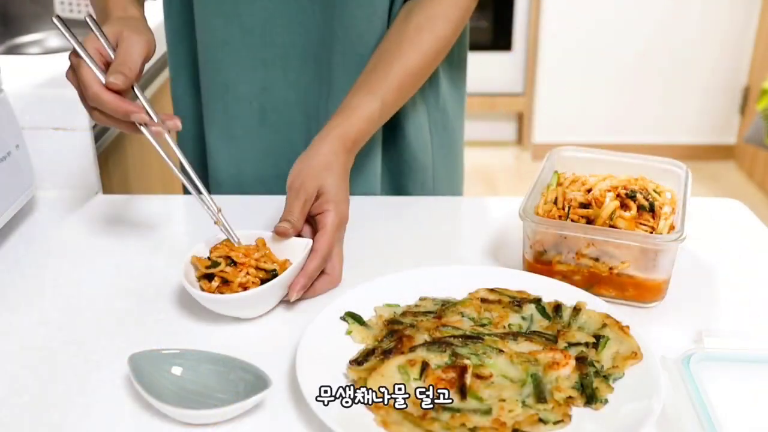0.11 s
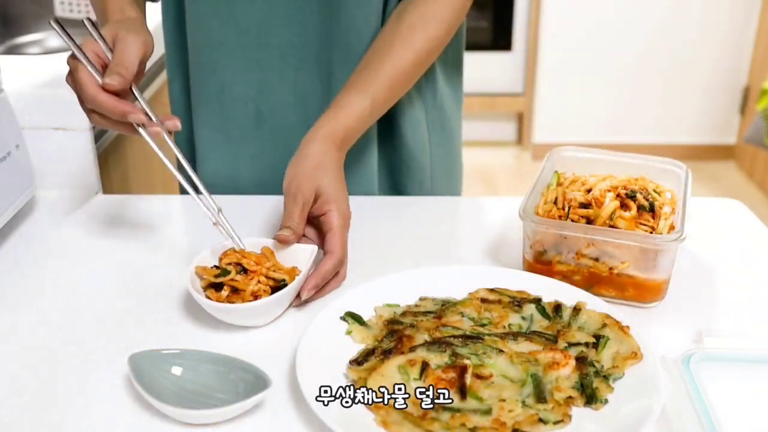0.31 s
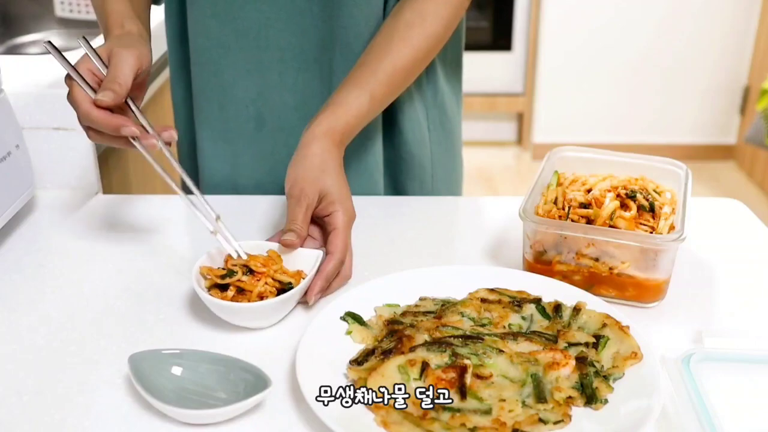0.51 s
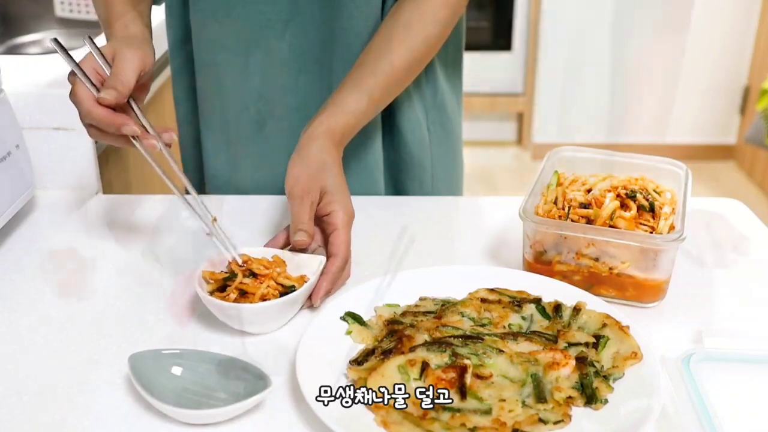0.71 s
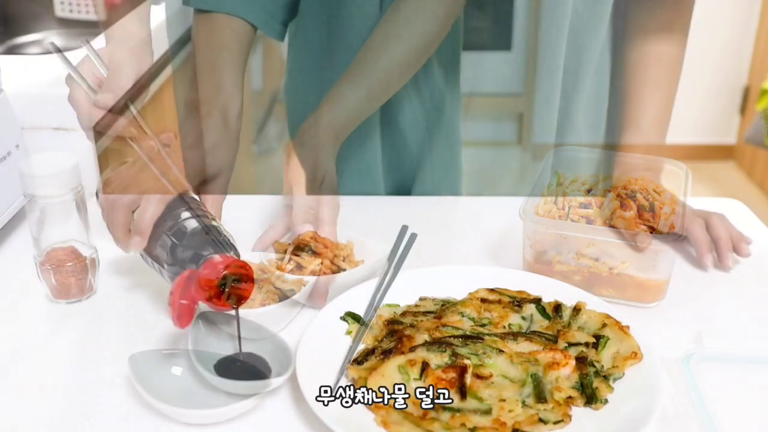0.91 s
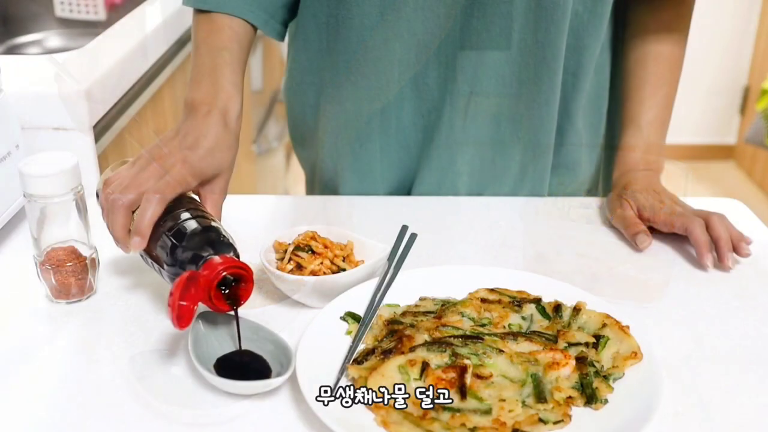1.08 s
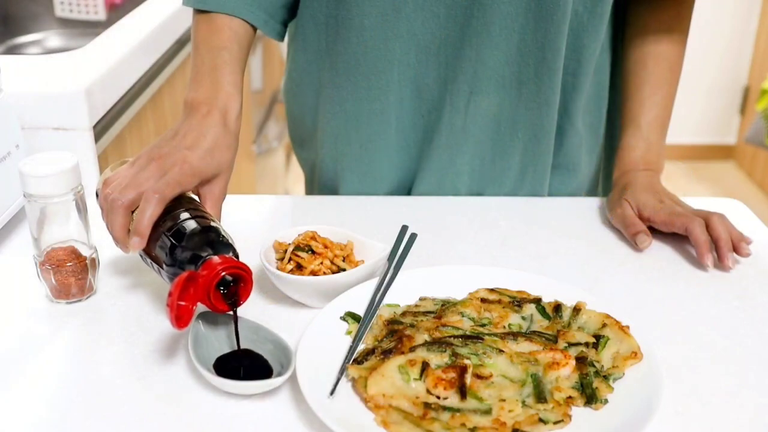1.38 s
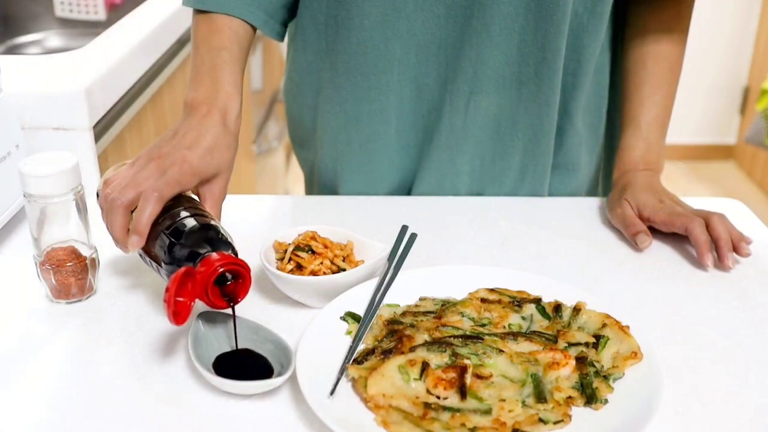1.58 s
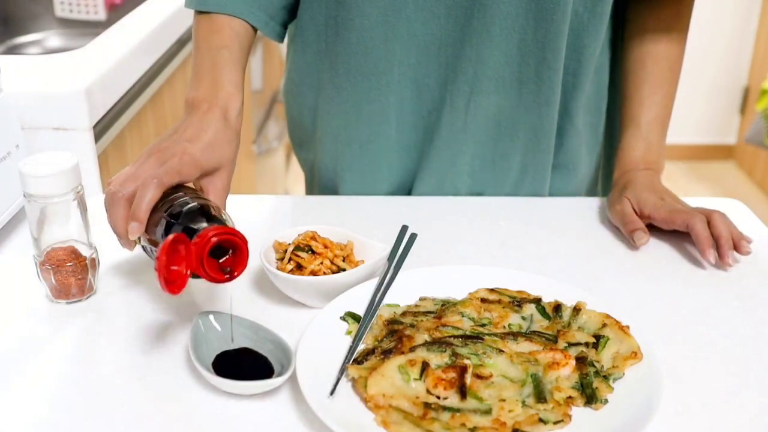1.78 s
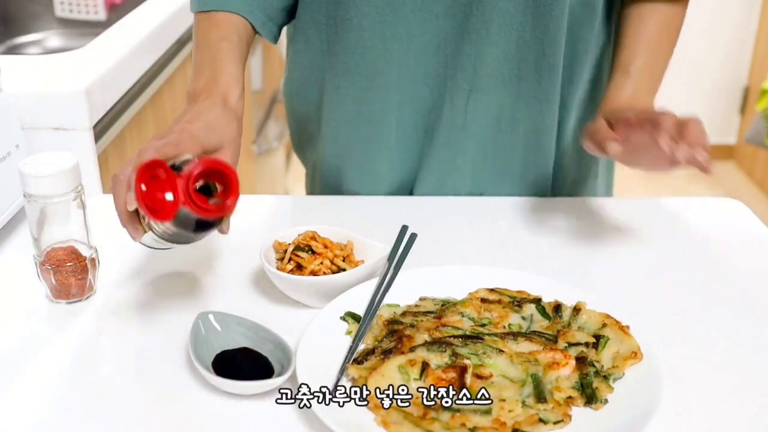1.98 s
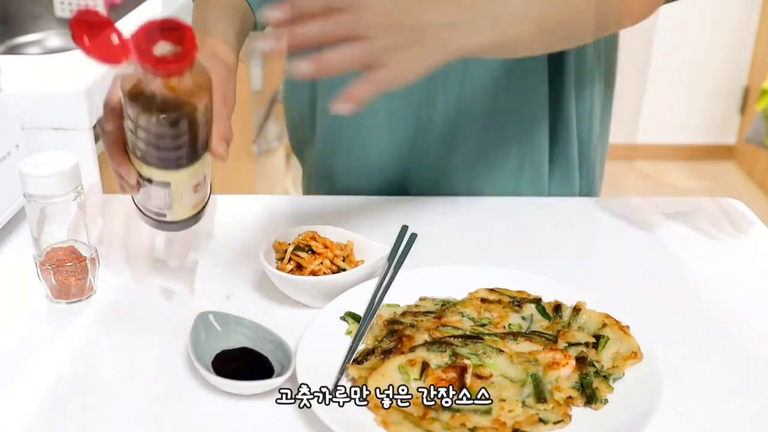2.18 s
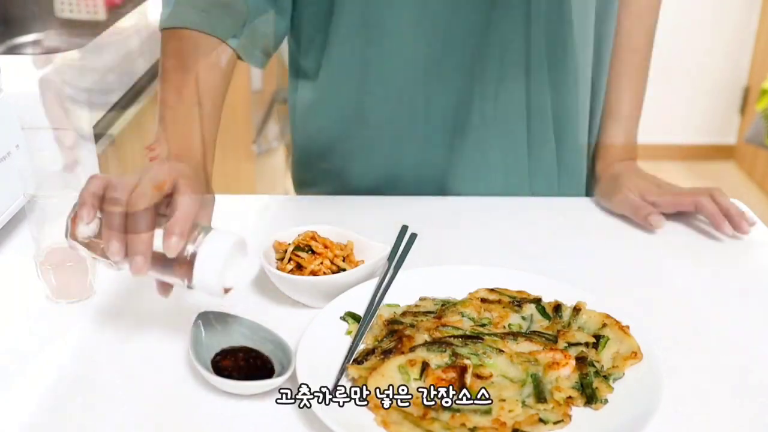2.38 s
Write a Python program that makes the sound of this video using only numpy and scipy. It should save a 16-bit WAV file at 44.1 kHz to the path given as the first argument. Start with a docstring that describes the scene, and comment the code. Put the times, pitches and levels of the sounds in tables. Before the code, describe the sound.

One hard, dry plastic lid snap distorts the close stereo microphone, then a bowl clunks on a tabletop, again more faintly; tiny bottle clicks come late, with an appliance humming throughout a lively kitchen.

```python
"""A plastic lid snaps shut on a glass container, close enough to overload the microphone, and the kitchen rings on.
A bowl then knocks twice on the table, and a sauce bottle gives faint ticks and drips, with thin high whistles.
Under it all runs the steady rush and hum of a kitchen appliance.
Blows are damped sine modes plus noise cracks, with echoes and a decaying noise tail for the room;
the whistles are gliding sines, and the appliance is coloured stereo noise with a few wavering tones."""
import sys
import numpy as np
from scipy import signal
from scipy.fft import rfft, irfft, next_fast_len
from scipy.io import wavfile
from scipy.ndimage import map_coordinates

SR = 44100
rng = np.random.default_rng(int(sys.argv[2]) if len(sys.argv) > 2 else 0)


def put_to_file(sound):
    """Save the sound as 16-bit audio at rate SR, in the file named by the first command-line argument."""
    columns = np.atleast_2d(sound).T  # one column per channel
    safe = np.clip(columns, -1, 1)
    whole_steps = np.round(safe * 32767)
    wavfile.write(sys.argv[1], SR, whole_steps.astype(np.int16))


N = 110250
T = np.arange(int(0.8 * SR)) / SR  # time axis of one blow, s


# the lid catching on the rim: start_s, level_db
LID_SNAPS = [(0.2009, 5), (0.2034, -8)]
# modes of lid and container: pitch_hz, relative_level_db, t60_s
LID_MODES = [(109, -24.5, 0.085), (215, -17, 0.054), (277, -19, 0.043), (463, -26, .04), (720, -22, 0.029),
             (986, -8.5, 0.032), (1148, -15, 0.039), (1500, -18.5, 0.026), (1990, -13, 0.017),
             (2176, -1, 0.019), (2600, -5.5, 0.022), (3070, -7.5, 0.011)]
# colour of the snap's noise crack: frequency_hz, relative_level_db
SNAP_CRACK_COLOUR = [(100, -10), (700, -4), (2200, 5.5), (3300, -6), (5000, -21.5), (9000, -26),
                     (16000, -41)]
# colour of what the lid sends into the room: frequency_hz, relative_level_db (per Hz)
SNAP_ROOM_COLOUR = [(50, -28), (90, -10), (210, -0.5), (380, -5.5), (750, 2), (1100, -0.5), (1500, 0.5),
                    (2200, 3), (2750, -6.5), (3400, -15), (5000, -25), (7000, -42), (14000, -66)]
SNAP_CRACK_DB, SNAP_CRACK_T60_S, SNAP_ATTACK_S = -0.5, 0.014, 0.00029
SNAP_ECHO_DB, SNAP_WET_DB = -16.5, -18.5


def lid():
    """The lid catches with a noise crack over the short modes of plastic and container."""
    out = np.zeros((2, N))
    for start_s, level_db in LID_SNAPS:
        crack = amp(SNAP_CRACK_DB) * fade(SNAP_CRACK_T60_S) * noise(SNAP_CRACK_COLOUR)
        blow = rise(SNAP_ATTACK_S) * (ring(LID_MODES) + crack)
        echoes = amp(SNAP_ECHO_DB) * walls(blow)
        tail = amp(SNAP_WET_DB) * room(SNAP_ROOM_COLOUR)
        add(out, start_s, amp(level_db) * (near(blow) + echoes + tail))
    return out


# the bowl's foot meeting the table: start_s, level_db, thud_pitch_hz, thud_level_db, contact_brightness_hz
BOWL_CONTACTS = [(0.6145, -32, 716, -1, 1740), (0.6665, -22, 670, -4.5, 2400), (0.6712, -16, 713, -8, 4830),
                 (0.6738, -15.5, 726, -0.5, 4500), (0.6818, -20, 691, -7, 2000),
                 (0.8925, -30, 593, 2.5, 1500), (0.897, -25, 758, -4, 7000), (0.8993, -25, 770, 0.5, 7000)]
# modes of the bowl on the table: pitch_hz, relative_level_db, t60_s
BOWL_MODES = [(232, -12, 0.13), (265.7, -11.5, 0.09), (470, -16, 0.11), (564, -13.5, 0.11),
              (854, -5.5, 0.041), (983, -16, 0.18), (1320, -9.5, 0.11), (1570, -13, 0.065),
              (1690, -24, 0.07), (2177, -4, 0.026), (2780, -17, 0.042), (3100, -14, 0.031),
              (4900, -36.5, 0.13)]
# the notes that linger after a knock: pitch_hz, relative_level_db, t60_s
LINGERING_MODES = [(265.6, -35, 0.59), (570, -44, 0.17), (1820, -22, 0.35), (2224, -19, 0.2)]
# colour of the knock's noise crack: frequency_hz, relative_level_db
KNOCK_CRACK_COLOUR = [(100, -22), (400, -10), (1000, -4.5), (2300, 6), (3200, -8), (4000, -24), (8000, -31),
                      (16000, -68)]
# colour of what the knocks send into the room: frequency_hz, relative_level_db (per Hz)
KNOCK_ROOM_COLOUR = [(80, -40), (250, 3), (450, -5), (730, 2), (1000, -2.5), (1600, -1), (2250, -5),
                     (2800, -11.5), (3600, -18.5), (5000, -36), (10000, -65)]
KNOCK_CRACK_DB, KNOCK_CRACK_T60_S, KNOCK_ATTACK_S = -1, 0.027, 0.00026
THUD_T60_S, THUD_AFTER_DB, THUD_AFTER_T60_S = 0.085, -16, 0.37
KNOCK_ECHO_DB, KNOCK_WET_DB = -14.5, -14.5


def bowl():
    """Each knock is a few quick contacts, soft or hard: a table thud under the bowl's ring and lingering notes."""
    out = np.zeros((2, N))
    for start_s, level_db, thud_hz, thud_db, bright_hz in BOWL_CONTACTS:
        crack = amp(KNOCK_CRACK_DB) * fade(KNOCK_CRACK_T60_S) * noise(KNOCK_CRACK_COLOUR)
        # the thud decays in two stages: a strong short one and a weak long one
        thud = ring([(thud_hz, thud_db, THUD_T60_S),
                     (thud_hz, thud_db + THUD_AFTER_DB, THUD_AFTER_T60_S)])
        blow = rise(KNOCK_ATTACK_S) ** 2 * (ring(BOWL_MODES) + ring(LINGERING_MODES) + thud + crack)
        echoes = amp(KNOCK_ECHO_DB) * walls(blow)
        tail = amp(KNOCK_WET_DB) * room(KNOCK_ROOM_COLOUR)
        # softer contacts lose their treble from a lower frequency
        contact = filtered(near(blow) + echoes + tail, lambda hz: 1 / np.hypot(1, (hz / bright_hz) ** 2))
        add(out, start_s, amp(level_db) * contact)
    return out


# ticks, drips and a soft bump as the bottle is handled:
# start_s, ring_level_db, ring_pitch_hz, ring_t60_s, click_level_db
BOTTLE_TICKS = [(1.841, -36, 9550, 0.017, -50), (1.9473, -37, 5000, 0.014, -30.5),
                (1.9755, -39.5, 4340, 0.013, -52), (1.9835, -39, 3120, 0.024, -42),
                (1.987, -37.5, 2600, 0.027, -54), (2.1741, -35, 1952, 0.061, -32.5),
                (2.1758, -43, 5990, 0.02, -49), (2.1945, -38.5, 3950, 0.031, -45),
                (2.3375, -33, 283, 0.2, -34), (2.375, -34.5, 10700, 0.027, -39)]
# colour of the click noise: frequency_hz, relative_level_db
CLICK_COLOUR = [(500, -12), (2000, 13), (5000, -1), (11000, 1), (13000, -6), (16000, -30)]
# colour of what the ticks send into the room: frequency_hz, relative_level_db (per Hz)
TICK_ROOM_COLOUR = [(500, -2), (2000, 1), (5000, -4), (11000, -14), (13500, -35)]
CLICK_T60_S, TICK_ATTACK_S, TICK_WET_DB = 0.015, 0.00082, -18.5
FUZZ_WIDTH, FUZZ_GAIN = 0.12, 0.84  # half-width of the fuzz as a fraction of pitch; its rms


def bottle():
    """Tiny noise clicks, each with a short ring of a sine roughened by narrow noise at its pitch."""
    out = np.zeros((2, N))
    for start_s, ring_db, pitch_hz, t60_s, click_db in BOTTLE_TICKS:
        fuzz = unit(filtered(rng.standard_normal(len(T)),
                             lambda hz: 1 / (1 + ((hz / pitch_hz - 1) / FUZZ_WIDTH) ** 2)))
        tone = np.sin(2 * np.pi * pitch_hz * T) + FUZZ_GAIN * fuzz
        rough_ring = amp(ring_db) * fade(t60_s) * tone
        click = amp(click_db) * fade(CLICK_T60_S) * noise(CLICK_COLOUR)
        direct = near(rise(TICK_ATTACK_S) * (rough_ring + click))
        add(out, start_s, direct + amp(click_db + TICK_WET_DB) * room(TICK_ROOM_COLOUR))
    return out


# faint thin whistles: start_s, length_s, start_pitch_hz, end_pitch_hz, level_db
WHISTLE_GLIDES = [(0.0, .08, 12750, 12950, -64), (0.108, .07, 12900, 12600, -70),
                  (0.11, .07, 14300, 13400, -76), (1.965, 0.16, 11750, 12500, -70),
                  (1.96, 0.1, 10400, 10900, -70), (2.07, 0.12, 11200, 11300, -71)]
WHISTLE_BLUR_RAD, WHISTLE_FLUTTER_DB = 0.9, 3  # sizes of the random phase and level wobbles


def whistle():
    """Faint high sine glides, blurred in phase and fluttering in level, that come and go."""
    out = np.zeros(N)
    for start_s, length_s, start_hz, end_hz, level_db in WHISTLE_GLIDES:
        hz = np.linspace(start_hz, end_hz, int(length_s * SR))
        blur = WHISTLE_BLUR_RAD * wobble(420)[:len(hz)]
        flutter_db = WHISTLE_FLUTTER_DB * wobble(76)[:len(hz)]
        tone = np.sin(2 * np.pi * np.cumsum(hz) / SR + blur)
        add(out, start_s, amp(level_db + flutter_db) * signal.windows.tukey(len(hz)) * tone)
    return out


# colour of the rushing air: frequency_hz, relative_level_db (per Hz)
RUSH_COLOUR = [(15, -38), (28, -8), (58, -8), (85, -10.5), (125, -12.5), (170, -6.5), (220, -6.5),
               (350, -8.5), (640, -11), (1000, -12.5), (1900, -18.5), (2600, -24), (3500, -28.5),
               (6000, -34.5), (16000, -63)]
# colour of the fine hiss: frequency_hz, relative_level_db (per Hz)
HISS_COLOUR = [(1500, -13), (4000, 1.5), (7000, 0.5), (11500, 1.5), (12400, -7), (14500, -21), (15500, -29)]
# air levels over time: time_s, rush_level_db, hiss_level_db
AIR_LEVELS = [(0, -35.5, -56), (0.18, -37.5, -57), (0.3, -36.5, -59.5), (0.8, -39, -61.5), (1.05, -39, -61),
              (1.4, -36.5, -58.5), (1.8, -36, -57), (2.2, -39, -56.5), (2.5, -40, -54)]
# motor hum tones: pitch_hz, level_db (before sway and swell)
HUM_TONES = [(59.3, -55.5), (162, -45), (587, -53.5), (673, -55.5)]
# slow rise and fall of the hum: time_s, gain_db
HUM_GAIN = [(0, -0.5), (0.3, 6), (0.7, -4), (1.0, -1.5), (1.3, 4), (1.6, -3), (2.0, 0.5), (2.5, -5)]
HUM_SWAY_DB, HUM_DRIFT_RAD = 3, 1  # sizes of the random level and phase wobbles
APPLIANCE_PAN_DB = -0.5  # left minus right


def appliance():
    """Rushing air and fine hiss as diffuse noise, with a motor hum of tones wavering in level and phase."""
    t = np.arange(N) / SR
    time_s, rush_db, hiss_db = np.transpose(AIR_LEVELS)
    rush = amp(np.interp(t, time_s, rush_db)) * unit(diffuse(RUSH_COLOUR, size=N))
    hiss = amp(np.interp(t, time_s, hiss_db)) * unit(diffuse(HISS_COLOUR, size=N))
    hum = np.zeros(N)
    for pitch_hz, level_db in HUM_TONES:
        level = amp(level_db + HUM_SWAY_DB * wobble(5.92))
        drift = HUM_DRIFT_RAD * wobble(9.25)
        hum += level * np.sqrt(2) * np.sin(2 * np.pi * pitch_hz * t + drift)
    swell = amp(np.interp(t, *np.transpose(HUM_GAIN)))
    pan = amp(APPLIANCE_PAN_DB / 2 * np.array([[1], [-1]]))
    return (rush + hiss + swell * hum) * pan


# stereo balance of near sound: frequency_hz, left_minus_right_db
NEAR_BALANCE = [(200, 1), (500, 5.5), (1000, 6.5), (2100, 6), (4200, -16.5), (9000, 3)]
# phase by which the left leads for near sound: frequency_hz, lead_rad
NEAR_LEAD = [(200, 0), (1000, 0.55), (2100, 1), (4200, 1.8), (8500, 1), (15000, 5)]


def near(x):
    """Direct sound reaching the microphones from slightly left, as level and phase offsets between the sides."""
    def left_over_right(hz):
        return amp(along(NEAR_BALANCE, hz)) * np.exp(1j * along(NEAR_LEAD, hz))
    # half the offset goes to each side
    return filtered(x, lambda hz: left_over_right(hz) ** np.array([[0.5], [-0.5]]))


# early echoes: delay_s, relative_level_db
EARLY_ECHOES = [(0.0135, -8), (0.032, -4), (0.0445, 3.5)]
ECHO_DULL_HZ = 2640


def walls(x):
    """The first echoes from the nearest surfaces: delayed copies, dulled on the way."""
    def delays(hz):
        return sum(amp(db) * np.exp(-2j * np.pi * hz * delay_s) for delay_s, db in EARLY_ECHOES)
    return filtered(x, lambda hz: delays(hz) / (1 + (hz / ECHO_DULL_HZ) ** 6))


# decay of the kitchen: frequency_hz, t60_s
ROOM_DECAY = [(100, 0.27), (300, 0.47), (1000, 0.62), (2200, 0.6), (4500, 0.46), (10000, 0.52)]
ROOM_BUILD_S, WALL_S, WALL_DB, WALL_SPREAD_S = 0.0075, 0.084, -10.5, 0.036


def room(spectrum):
    """The kitchen's dense answer to one blow: decaying noise, swelling with the echo from the far wall."""
    hz, t, cells = signal.stft(unit(diffuse(spectrum, size=len(T))), SR, nperseg=256)
    decay = fade(along(ROOM_DECAY, hz)[:, None], t)  # each frequency dies at its own rate
    tail = signal.istft(cells * decay, SR, nperseg=256)[1][:, :len(T)]
    far_wall = amp(WALL_DB) * np.exp(-((T - WALL_S) / WALL_SPREAD_S) ** 2)
    return tail * rise(ROOM_BUILD_S) * (1 + far_wall)


# left-right likeness of diffuse sound: frequency_hz, correlation (-1 to 1)
STEREO_LIKENESS = [(60, 0.94), (200, 0.89), (450, 0.69), (1000, 0.18), (2100, -0.46), (4400, -0.6),
                   (9000, -0.76), (15000, -0.29)]


def diffuse(spectrum, size):
    """Coloured stereo noise from all around; the mid-side mix sets how alike the two sides are."""
    def mid_side_gains(hz):
        turn = np.arccos(np.clip(along(STEREO_LIKENESS, hz), -0.99, 0.99)) / 2
        return amp(along(spectrum, hz)) * np.array([np.cos(turn), np.sin(turn)])
    mid, side = filtered(rng.standard_normal((2, size)), mid_side_gains)
    return np.array([mid + side, mid - side])


def noise(spectrum):
    """A short stretch of coloured noise of rms 1."""
    return unit(filtered(rng.standard_normal(len(T)), lambda hz: amp(along(spectrum, hz))))


def ring(modes):
    """Damped sine modes, a little different in level and phase at every blow."""
    total = np.zeros(len(T))
    for pitch_hz, level_db, t60_s in modes:
        level = amp(level_db + rng.normal(0, 1))
        total += level * fade(t60_s) * np.sin(2 * np.pi * pitch_hz * T + rng.normal(0, 0.77))
    return total


def amp(db):
    """Decibels to gain."""
    return 10 ** (np.asarray(db) / 20)


def unit(x):
    """Scaled to rms 1."""
    return x / np.sqrt(np.mean(x ** 2) + 1e-20)


def along(points, hz):
    """(frequency_hz, value) points read on a log frequency axis."""
    point_hz, value = np.transpose(points)
    return np.interp(np.log(hz + 1), np.log(point_hz + 1), value)


def fade(t60, t=T):
    """Exponential decay, down 60 dB after t60 seconds."""
    return np.exp(-np.log(1000) * t / t60)


def rise(seconds):
    """A soft exponential start."""
    return 1 - np.exp(-T / seconds)


def wobble(rate):
    """A smooth random curve, rate knots a second."""
    return map_coordinates(rng.standard_normal(200), [np.arange(N) * rate / SR], mode="wrap")


def filtered(x, response):
    """x times a response of frequency, padded so that the end does not wrap onto the start."""
    n = x.shape[-1]
    m = next_fast_len(n + SR // 10)
    return irfft(rfft(x, m) * response(np.fft.rfftfreq(m, 1 / SR)), m)[..., :n]


def add(track, start_s, sound):
    """Mixes a sound in at its start time, cut at the end of the track."""
    part = track[..., max(round(start_s * SR), 0):][..., :sound.shape[-1]]
    part += sound[..., :part.shape[-1]]


def scene():
    """Everything on the table, heard in the kitchen."""
    return lid() + bowl() + bottle() + whistle() + appliance()


CLIP_TOP, CLIP_HARDNESS, TOP_HZ = 1.0, 5, 16300  # ceiling (full scale = 1), sharpness of its knee, band limit


def record(dry):
    """The recorder flattens the peaks of the snap and cuts steeply above its band limit."""
    flattened = dry / (1 + np.abs(dry / CLIP_TOP) ** CLIP_HARDNESS) ** (1 / CLIP_HARDNESS)
    return filtered(flattened, lambda hz: 1 / (1 + (hz / TOP_HZ) ** 120))


dry = scene()
out = record(dry)
put_to_file(out)
```